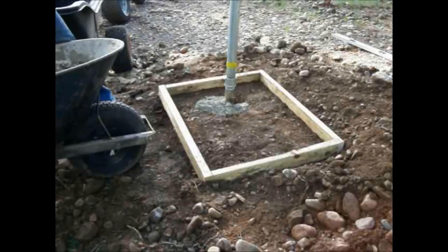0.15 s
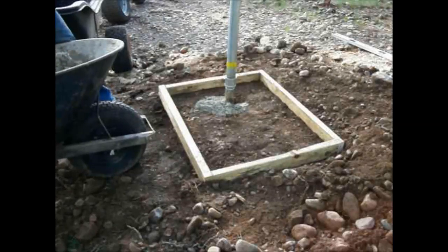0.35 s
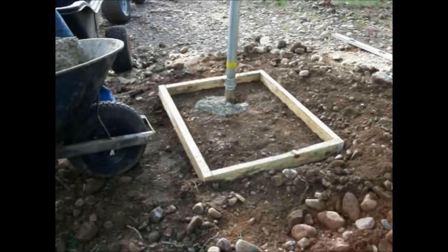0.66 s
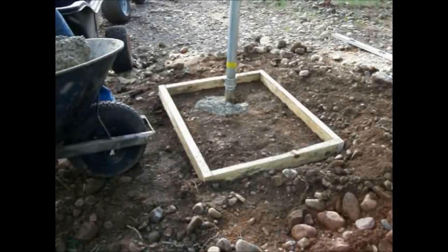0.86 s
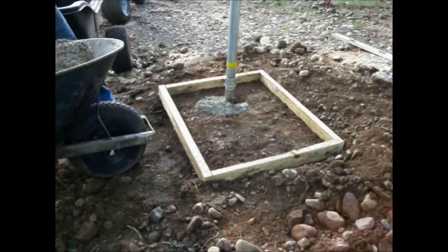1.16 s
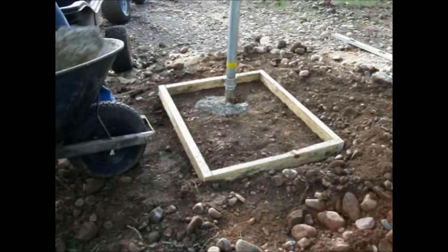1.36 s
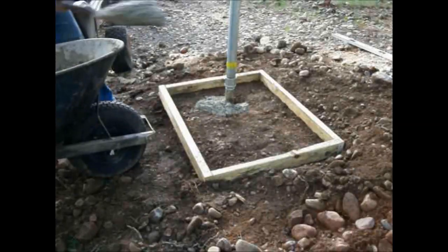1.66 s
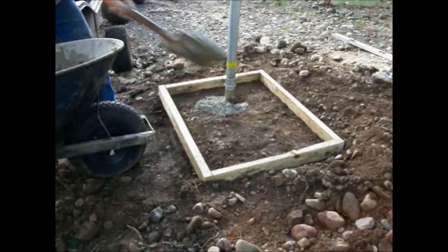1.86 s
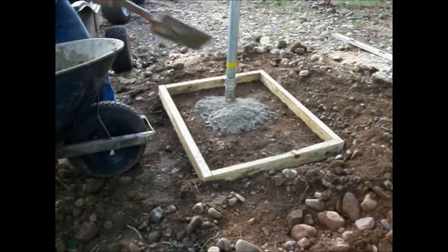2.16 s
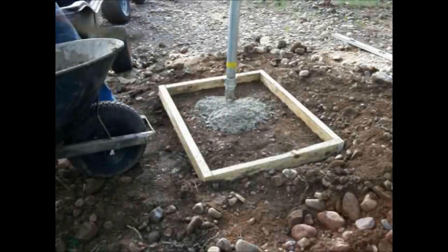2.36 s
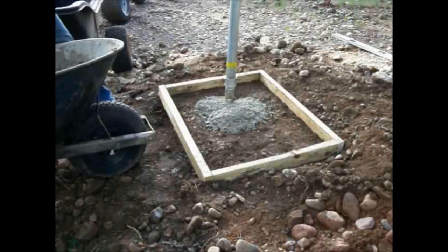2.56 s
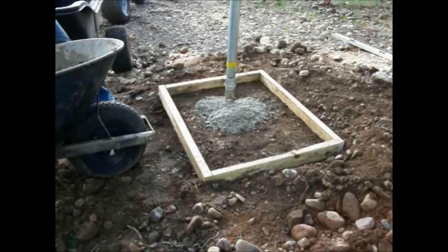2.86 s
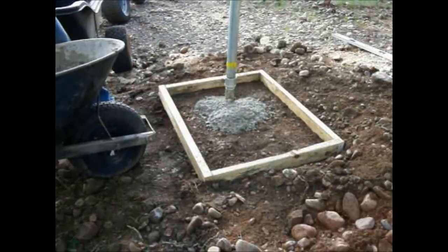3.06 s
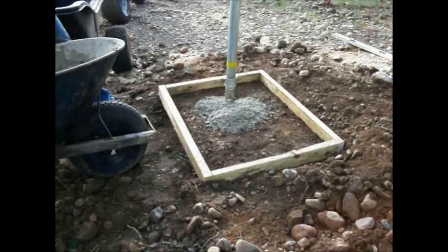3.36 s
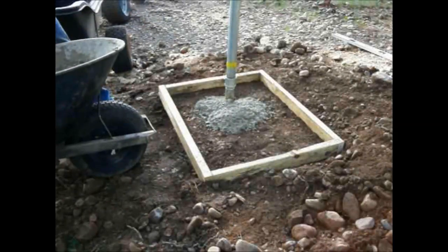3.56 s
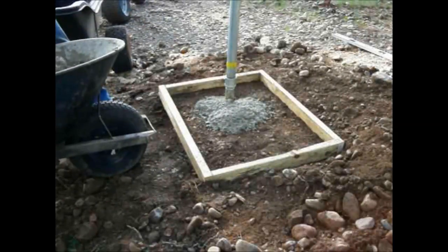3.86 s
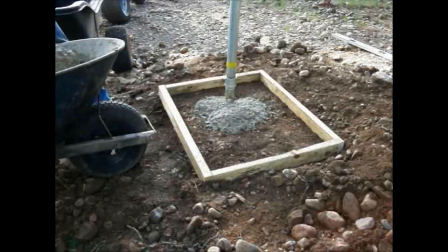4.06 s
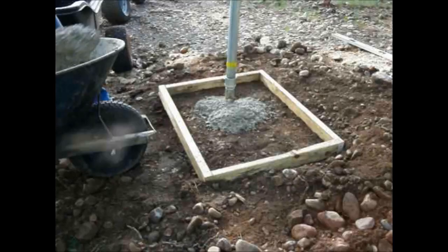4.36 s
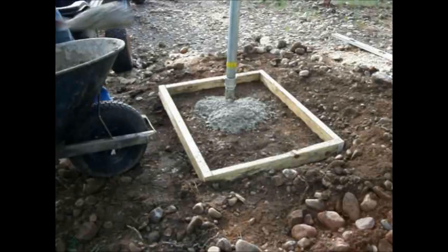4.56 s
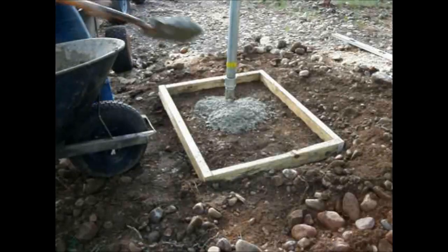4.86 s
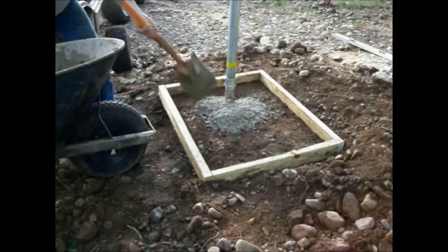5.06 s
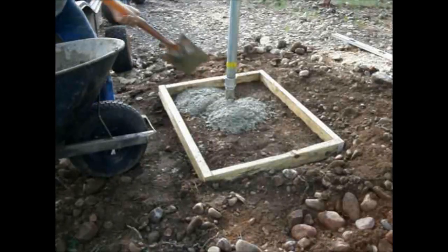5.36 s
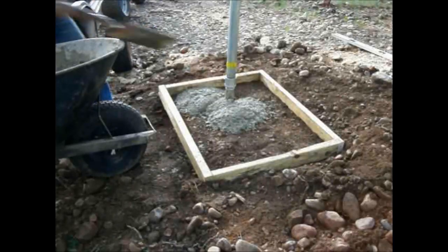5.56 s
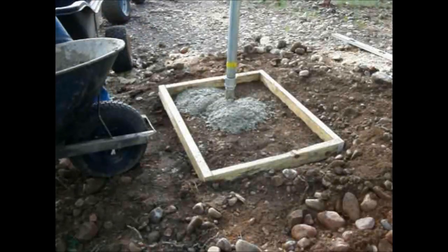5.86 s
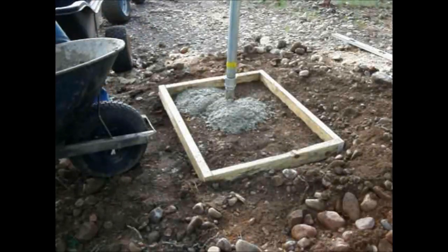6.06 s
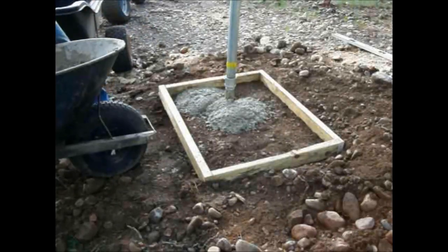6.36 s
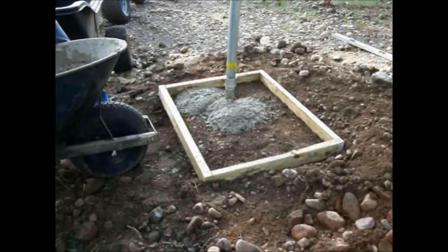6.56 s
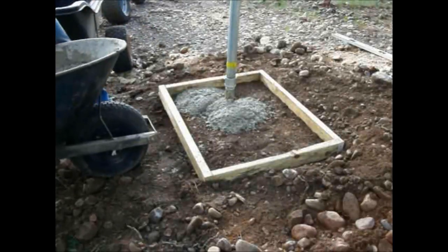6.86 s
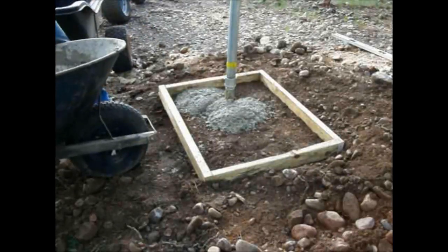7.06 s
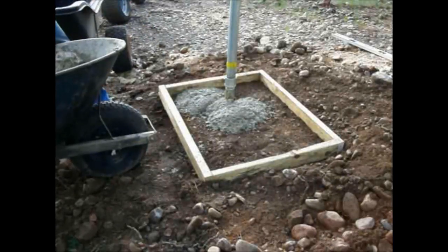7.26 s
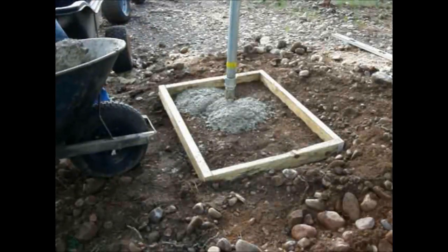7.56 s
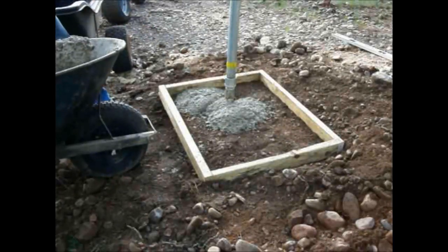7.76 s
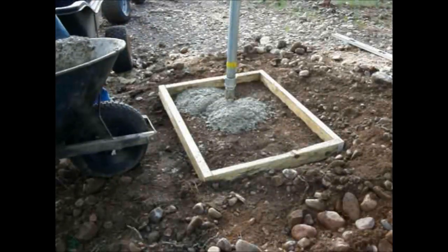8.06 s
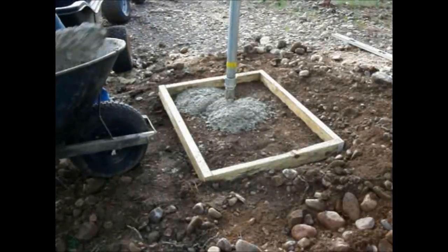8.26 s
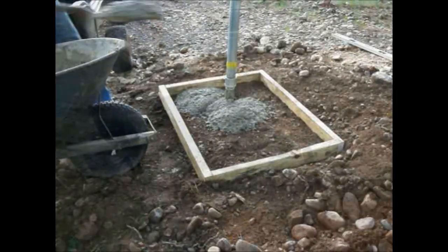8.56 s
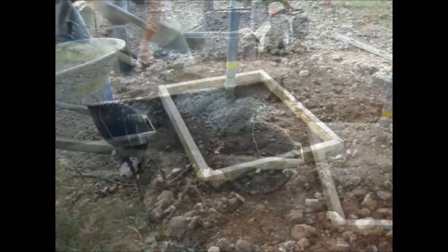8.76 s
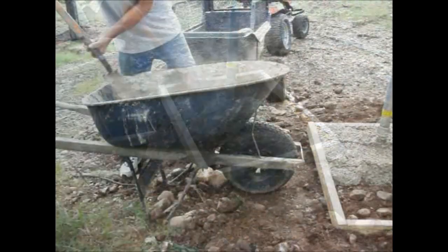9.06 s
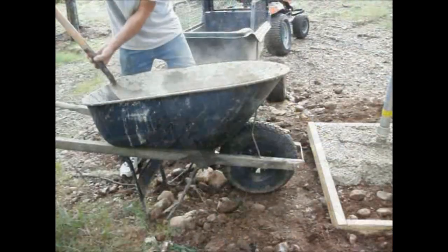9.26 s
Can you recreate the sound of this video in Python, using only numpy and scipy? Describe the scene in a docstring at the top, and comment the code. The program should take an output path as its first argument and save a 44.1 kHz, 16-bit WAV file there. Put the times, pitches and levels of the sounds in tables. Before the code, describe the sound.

Outdoors, faint air noise, a far hum and low wind rumble sit under close shovel work, with soft wind bumps near 0.8 and 1.3 seconds. Light grit settles, then mix slides off the blade at 1.6 and more sharply at 2.0. At 2.46 the blade cracks against the steel rim with a short double clang. From 2.9 to 3.2 a harsh, jerky dig crunches and scrapes through wet gravel, then loose stones settle. Clicks come around 4.5 to 4.7, and a gritty dump at 5.15 to 5.25. At 5.64 to 5.8 the blade drags and clangs in a quick ringing cluster. A second dig, 6.2 to 6.55, grinds hollowly with a thud and stuttering tub groan, fading by 6.9. Sparse settling follows; soft slides return from 8.6, a swishy scrape at 9.05, then a loud tub boom at 9.19 and a crunching dig cut off at the end, about 9.4.

```python
"""Outdoors, a shovel digs wet gravelly concrete out of a steel wheelbarrow and tips it on the ground.
Uneven small contacts make the grit crunch; stones jolt the blade, which scrapes with damped resonances.
The tub booms and groans, the empty blade rings on the rim as a set of dying tones, and stones clack as
short noise bursts. Behind are air noise, a far hum and a low rumble, mostly wind on the microphone.
A small camera with gain control samples it all at a quarter of the rate."""
import sys
import numpy as np
from scipy import signal
from scipy.fft import rfft, irfft, next_fast_len
from scipy.io import wavfile
from scipy.ndimage import uniform_filter1d

SR = 44100
rng = np.random.default_rng(int(sys.argv[2]) if len(sys.argv) > 2 else 0)


def master(y):
    """Save y as 16-bit WAV."""
    cut = np.clip(np.atleast_2d(y).T, -1, 1)
    pcm = np.round(cut * 32767)  # scale
    wavfile.write(sys.argv[1], SR, pcm.astype(np.int16))


N = 415863
T = np.arange(N) / SR

# In all tables, levels are relative: later mixing gains shift them.
# resonances of the blade under load: f/Hz, width/Hz, level/dB
LOADED_BLADE = [(797, 250, 4.5), (966, 120, 5.5), (1230, 47, -14), (1964, 46, 6), (2200, 120, 7.5)]


def gain_of(db):
    """Turns decibels into an amplitude factor."""
    return 10 ** (np.asarray(db) / 20)


def evened(x):
    """Scales a sound to an rms of 1."""
    return x / np.sqrt(np.mean(x ** 2) + 1e-20)


def level(rows, column):
    """Reads a dB column as amplitude over time, practically silent outside the table."""
    rows = np.array(rows)
    return gain_of(np.interp(T, rows[:, 0], rows[:, column], left=-200, right=-200))


def track(tables):
    """Draws one frequency curve through tables of (t/s, f/Hz)."""
    return np.interp(T, *np.vstack(tables).T)


def coloured(x, points):
    """Filters x with a smooth curve through (f/Hz, level/dB) points, then evens it."""
    f, db = np.transpose(points)
    size = next_fast_len(N)
    hz = np.fft.rfftfreq(size, 1 / SR)
    curve_db = np.interp(np.log(hz + 1), np.log(f + 1), db)
    return evened(irfft(rfft(x, size) * gain_of(curve_db), size)[:N])


def resonate(x, hz, width):
    """Lets x excite one resonance (two poles, gain about 1 at its peak); a narrow one rings longer."""
    r = np.exp(-np.pi * width / SR)
    turn = 2 * r * np.cos(2 * np.pi * hz / SR)
    return signal.lfilter([(1 - r * r) / 2, 0, (r * r - 1) / 2], [1, -turn, r * r], x)


def follow(x, hz, width):
    """A resonance that moves: shift its frequency to zero, smooth, shift back."""
    turn = np.exp(2j * np.pi * np.cumsum(hz) / SR)
    r = np.exp(-np.pi * width / SR)
    return 2 * (turn * signal.lfilter([1 - r], [1, -r], x / turn)).real


def lumps(per_s, depth_db):
    """A gain that wanders at random, with per_s turning points a second."""
    knots = rng.standard_normal(1000)
    return gain_of(depth_db * np.interp(T * per_s, np.arange(1000), knots))


def grains(per_s, spread_db, lo_hz, hi_hz, cycles, count=14):
    """Random contacts of uneven size, each a few dying cycles at one of count pitches."""
    size = gain_of(spread_db * np.minimum(rng.exponential(1, N), 5))
    size *= rng.random(N) < per_s / SR
    size *= rng.choice([-1, 1], N)
    kind = rng.integers(0, count, N)
    out = np.zeros(N)
    for k, hz in enumerate(np.geomspace(lo_hz, hi_hz, count)):
        out += resonate(size * (kind == k), hz, hz / (np.pi * cycles))
    return evened(out)


def bump(s, hold, db, rise, fall):
    """An amplitude that swells to s, holds and dies away; all times in seconds."""
    out = np.zeros(N)
    near = slice(max(round((s - .5) * SR), 0), round((s + hold + .8) * SR))
    t = T[near] - s
    swell = np.minimum(t, 0) / max(rise, 1e-3)
    fade = np.maximum(t - hold, 0) / max(fall, 1e-3)
    out[near] = gain_of(db) * np.exp(swell - fade)
    return out


def add(mix, s, sound):
    """Mixes a sound in at s seconds, cut off at the end of the mix."""
    part = mix[round(s * SR):][:len(sound)]
    part += sound[:len(part)]


def outdoors():
    """Air noise and a far hum waver at random; a low rumble and single gusts are slow pressure noise."""
    # tone of the distant air: f/Hz, level per Hz/dB
    air_tone = [(12, -58), (20, -5.5), (35, -19), (41, -39), (54, -24.5), (128, -14), (182, -18.5),
                (880, -21), (4050, -32), (4780, -43), (5500, -25), (7150, -80), (12100, -120)]
    # strength of the low rumble: wind, and at 6.38 s the thud of the dig: t/s, level/dB
    rumble_level = [(0, -52), (.07, -64), (.3, -50), (.59, -42), (.7, -49), (.9, -50), (1.04, -42.5),
                    (1.2, -50), (1.4, -49), (1.75, -58), (5.3, -54.5), (6.05, -62), (6.38, -39), (6.5, -61),
                    (9.1, -62), (9.43, -54)]
    # single gusts pushing the microphone: t/s, peak level/dB, f/Hz
    puffs = [(.785, -29.5, 30.2), (1.3, -26.5, 32.2)]
    # tone of the rumble: (f/Hz, level/dB)
    rumble_tone = [(12, -12), (30, -0.5), (70, -2), (160, -13.5), (400, -70)]
    hum_hz = 133.5

    air = gain_of(-43.5) * coloured(rng.standard_normal(N) * lumps(per_s=9, depth_db=.8), air_tone)
    hum = resonate(rng.standard_normal(N), hum_hz, 13.0) + 0.14 * np.sin(2 * np.pi * hum_hz * T)
    rumble = coloured(rng.standard_normal(N) * lumps(per_s=18, depth_db=3.5), rumble_tone)
    out = air + gain_of(-54.5) * evened(hum) + level(rumble_level, 1) * rumble
    for s, db, hz in puffs:
        turns = np.arange(0, 1.5, hz / SR)  # one and a half cycles
        add(out, s, gain_of(db) * np.sin(2 * np.pi * turns) * np.hanning(len(turns)))
    return out


def clacks():
    """Each short clack is a dying noise burst around its own pitch; louder ones ring longer."""
    # short clacks: stones, and at 2.4575 s the crack of the blade's strike: t/s, level/dB, f/Hz
    hits = [(.429, -26, 2200), (.544, -31, 2000), (1.574, -27, 2400), (1.596, -28, 3400),
            (1.609, -22, 3500), (1.731, -23, 4200), (1.967, -21, 2450), (2.012, -6, 2900),
            (2.373, -24, 3600), (2.4575, 6, 1750), (2.488, -8, 1750), (2.8835, -27, 3800),
            (2.904, -2, 2950), (2.934, -8, 2550), (2.989, -5, 1400), (3.052, 2, 2750), (3.282, -26, 2550),
            (4.048, -26, 3900), (4.209, -30, 4200), (4.304, -33, 2950), (4.4765, -17, 3600),
            (4.6425, -15, 4500), (4.662, -17, 4400), (4.698, -24, 3500), (4.74, -32, 3400),
            (5.134, -20, 3400), (5.162, -9, 3000), (5.517, -29, 1500), (5.64, -7, 1900), (5.714, -2, 3900),
            (6.188, -17, 3800), (6.197, -13, 4300), (6.224, -9, 2000), (6.249, -5, 1300), (6.297, -3, 2200),
            (6.3635, 3, 4300), (6.416, 2, 2350), (6.459, -6, 1300), (6.539, -13, 2400), (7.303, -27, 3900),
            (7.359, -32, 2900), (7.605, -33, 3200), (7.739, -31, 3500), (8.209, -34, 1850),
            (8.373, -32, 3250), (8.467, -29, 2500), (8.523, -29, 2500), (8.554, -27, 2050),
            (8.621, -24, 2200), (8.691, -21, 1600), (8.901, -17, 1650), (8.961, -22, 1650), (9.19, 8, 1550),
            (9.236, -6, 1600), (9.276, -3, 1250), (9.337, -1, 1300), (9.351, 0, 3600), (9.403, -7, 2200)]
    out, t = np.zeros(N), T[:5000]
    for (s, db, hz), noise in zip(hits, rng.standard_normal((len(hits), 5000))):
        burst = evened(resonate(noise, hz, 2000) + resonate(noise, hz, 440))
        t60 = .035 + .0005 * db  # seconds to die by 60 dB
        add(out, s, gain_of(db - 60 * t / t60) * burst)
    return out


def blade():
    """Strikes start the blade's modes, each stilling the ring before it; rim friction also feeds them."""
    # natural tones of the empty blade: f/Hz, level/dB, time to die by 60 dB/s
    modes = [(950, -34, 0.15), (1068, -0.5, 0.32), (1074, -15, 0.8), (1210, -6.5, 0.24), (1270, -25, 0.55),
             (1330, -13, 0.23), (1513, -8, 0.16), (1590, -16, 0.18), (1730, -4, 0.35), (1863, -11, .22),
             (1913, -5.5, 0.26), (2140, -6, 0.11), (2374, -5.5, 0.091), (2370, -17, 0.11),
             (2700, -23, 0.25), (2880, -32, 0.088), (3020, -6, 0.066), (3150, -12, 0.16), (3640, -5, 0.09),
             (3780, -3.5, 0.059), (3900, -6, 0.084), (4330, -39, 0.14), (4430, -13, 0.2), (4900, -23, 0.26),
             (5100, -47, .2)]
    # drags over the rim: t/s, length/s, friction feeding the modes/dB, rasp length/s, direct rasp/dB
    drags = [(2.456, 0.078, -24, 0.011, 2.5), (5.637, 0.078, -9, 0.074, -5),
             (5.715, .065, -16, 0.031, -0.5), (9.035, .055, -26, 0.048, -22)]
    # strikes on the rim: t/s, level/dB, brightness/dB per octave, time for the ring to swell up/s
    clangs = [(2.458, -5, 7.5, 0.0036), (2.488, 1, 0, 0.0094), (5.641, 1, 2.5, 0.0042),
              (5.695, -3.5, 3.5, 0.0034), (5.716, 2.5, 0, 0.0033), (5.744, -3.5, 6, 0.0026),
              (5.765, -8, 3.5, 0.0071), (6.749, -20, -2, 0.0021), (9.085, -22, -8, 0.017)]
    # a faint narrow swish before a dig: t/s, length/s, level/dB
    swishes = [(2.775, 0.16, -47), (6.04, .14, -50)]

    out = np.zeros(N)
    noise = evened(rng.standard_normal(N) * lumps(per_s=90, depth_db=3.0))
    for s, length, rub_db, rasp_s, rasp_db in drags:
        start = s - .01  # early enough to catch the swell
        near = slice(round(start * SR), round(start * SR) + 30000)
        rub = (noise * bump(s, length, rub_db, 0.00082, 0.033))[near]
        rasp = (noise * bump(s, rasp_s, rasp_db, 0.00082, 0.011))[near]
        # the root keeps long, narrow modes from coming out weaker
        fed = sum(gain_of(db) * np.sqrt(t60) * resonate(rub, hz, 3 / t60) for hz, db, t60 in modes)
        add(out, start, gain_of(22.5) * fed + 1.8 * resonate(rasp, 3500, 4500))

    hz, mode_db, t60 = np.transpose(modes)[:, :, None]
    t = T[:30000]
    until_next = np.diff(np.array(clangs)[:, 0], append=np.inf)
    # each strike lands on another spot, so the modes' balance differs
    spots_db = 2 * rng.standard_normal((len(clangs), len(modes), 1))
    for (s, db, tilt_db, swell), lasts, spot_db in zip(clangs, until_next, spots_db):
        struck_db = db - 7.5 + mode_db + tilt_db * np.log2(hz / 1070) + spot_db
        ring = (gain_of(struck_db - 60 * t / t60) * np.sin(2 * np.pi * hz * t)).sum(0)
        ring *= 1 - np.exp(-t / max(swell, 1e-3))
        ring *= np.exp(-np.maximum(t - lasts, 0) / 0.0045)  # the next strike stills it
        add(out, s, ring)

    swish_gain = sum(bump(*row, .02, .01) for row in swishes)
    return out + swish_gain * evened(resonate(noise, 3430, 350))


def tub(gain):
    """The steel tub groans with a stutter under the blade's uneven push and booms under single blows."""
    # resonances of the tub: f/Hz, width/Hz, level/dB
    tub_modes = [(211, 31, -8.5), (313, 100, -6.5), (489, 94, -9.5), (624, 27, -14.5)]
    # the tub's main tone under changing load: t/s, f/Hz
    main_tone = [(1.6, 430), (2.9, 425), (3.3, 400), (3.7, 385), (6.25, 420), (6.5, 405), (6.7, 365),
                 (6.82, 370), (7.2, 372), (9.2, 370)]
    # single blows: t/s, level/dB, time for the main tone to die by 60 dB/s
    blows = [(2.455, -8, 0.074), (2.905, -12, .12), (5.515, -29, 0.058), (5.639, -19, 0.092),
             (5.7, -17, 0.11), (6.22, -19, .06), (6.416, -11, 0.097), (6.5, -13, 0.04), (6.803, -12, 0.06),
             (9.19, 10.5, 0.19), (9.234, -3, 0.06), (9.339, -3, 0.1), (9.36, -9, .06), (9.405, -9, .08)]

    push = rng.standard_normal(N) * lumps(per_s=54, depth_db=3.0)
    groan_hz = track([main_tone])
    boom = sum(gain_of(db) * resonate(resonate(push, hz, w), hz, w) for hz, w, db in tub_modes)
    wobble_hz = groan_hz * lumps(per_s=45, depth_db=.33)
    groan = np.sin(2 * np.pi * np.cumsum(wobble_hz) / SR) * lumps(per_s=60, depth_db=5.0)
    stutter_hz = 45 * lumps(per_s=25, depth_db=2.)
    groan *= .3 + abs(np.cos(np.pi * np.cumsum(stutter_hz) / SR))  # stick and slip
    out = gain_of(-3.5) * gain * evened(0.5 * evened(boom) + groan)

    t = T[:12000]
    for s, db, t60 in blows:
        # side tones die faster than the main tone
        ring = sum(gain_of(d + 11.5 - 60 * t / 0.053) * np.sin(2 * np.pi * hz * t)
                   for hz, w, d in tub_modes)
        ring += sum(gain_of(d - 1 - 60 * t / 0.038) * np.sin(2 * np.pi * hz * t)
                    for hz, w, d in LOADED_BLADE[:2])
        ring += np.sin(2 * np.pi * groan_hz[round(s * SR)] * t)
        onset = np.minimum(t / 0.0016, 1)
        add(out, s, gain_of(db - 9.5 - 60 * t / t60) * ring * onset)
    return out


def handling():
    """How hard the mix is worked: digs, slides and settling add in power; depth sets the hollow tone."""
    # loose mix settling between strokes: t/s, level/dB, coarse part against it/dB
    settling = [(0, -42, 4), (.4, -40, -1), (.52, -41.5, -0.5), (.75, -55.5, 6), (1.2, -54, 10),
                (1.55, -46, 1), (1.9, -47, -6), (2.4, -56, 4), (2.53, -40, 0), (2.85, -59, 11),
                (3.3, -38, 6), (3.6, -43, 5), (4.0, -43.5, 0), (4.39, -52.5, -8), (4.95, -47.5, 3),
                (5.5, -56, -3), (5.8, -41, 2), (6.15, -63.5, 8), (6.86, -42.5, 6.5), (7.2, -42, 2.5),
                (7.6, -48, 0), (8.25, -60, 4), (8.6, -47, 2), (9.43, -38, 7)]
    # one curve a dig, blade pushed into the mix: t/s, effort/dB, depth (0 to 1)
    digs = [
        [(2.897, -30, .3), (2.903, -9.5, 0.5), (2.93, -11.5, 0.6), (2.99, -4, 0.6), (3.02, -12.5, 0.75),
         (3.058, -2, 0.67), (3.07, -5.5, 0.95), (3.085, -2, 0.8), (3.14, -6.5, 0.83), (3.185, -8, 0.82),
         (3.207, -23.5, 0.8), (3.28, -30.5, 0.44)],
        [(6.18, -38, 0), (6.22, -14, 0), (6.25, -9, 0.63), (6.285, -6, 0.48), (6.335, -3.5, 0.82),
         (6.36, -4.5, .65), (6.408, -10, 0.26), (6.42, -6, 0.4), (6.505, -13, 0.73), (6.535, -23.5, 0.14),
         (6.58, -27, 0.4), (6.72, -30.5, 0.62), (6.765, -25.5, 0.3), (6.815, -28.5, 0.2), (6.845, -42, .2)],
        [(9.187, -29, 0.5), (9.191, -3, 0.5), (9.198, -9, 0.8), (9.23, -15, 1), (9.236, -8, 1),
         (9.255, -14.5, 0.7), (9.29, -2, 0.3), (9.31, -8.5, 1), (9.333, -15, 0.6), (9.339, -4, 1),
         (9.37, -5, 0.8), (9.395, -13, .7), (9.43, -3, 0.47)],
    ]
    # each dig's mix against its effort: grit/dB, tub/dB
    mixes = [(-10.5, -6), (-9.5, -3), (-16.5, -21)]
    # mix sliding off or over the blade: peak t/s, grit level/dB, rise/s, fall/s, coarse against grit/dB
    slides = [(1.606, -31.5, 0.0087, 0.081, -2), (1.735, -38.5, 0.013, 0.073, -2),
              (1.975, -29, 0.019, .02, 2), (2.017, -11, .02, 0.025, -10), (2.094, -20, 0.031, 0.064, -1),
              (4.06, -41, .05, 0.07, -3), (4.478, -46, 0.009, 0.086, 1), (4.644, -29, 0.0027, 0.028, -8),
              (4.704, -35.5, .015, 0.0078, -8), (5.12, -29.5, 0.064, 0.056, -2),
              (5.165, -17, 0.02, 0.051, -1.5), (5.222, -12.5, 0.04, 0.019, -12),
              (5.3, -35.5, 0.051, 0.043, 1), (8.624, -32, .002, 0.082, 1.5), (8.71, -29, 0.044, .1, 2.5),
              (8.85, -40.5, 0.053, 0.052, 6), (8.93, -37, 0.056, 0.055, 3),
              (9.041, -12, 0.02, 0.035, -11.5), (9.08, -13, 0.03, 0.015, -7)]
    # the tub hums on: t/s, length/s, level/dB
    groans = [(0, 0.067, -45), (1.608, .01, -37), (3.177, .012, -19), (3.29, 0.29, -38),
              (6.368, .14, -11.5), (6.558, 0.097, -26), (6.682, 0.054, -28), (6.783, 0.021, -18),
              (6.88, 0.2, -39.5), (8.75, 0.15, -45)]
    # change from a buried blade to one at the surface
    shallow_grit_db, shallow_scrape_db, shallow_tub_db = 9, -5.5, -27
    # the hollow tone drops as the blade goes in
    bite_shallow_hz, bite_deep_hz = 1380, 720

    s, db, coarse_db = np.transpose(settling)
    layers_db = [db, db + coarse_db, db - 13.5]  # grit, scrape, tub
    power = np.array([gain_of(np.interp(T, s, layer_db)) for layer_db in layers_db]) ** 2
    bite = []
    jerks = lumps(per_s=45, depth_db=4)  # the buried blade advances in jerks
    for rows, (grit_db, tub_db) in zip(digs, mixes):
        s, db, depth = np.transpose(rows)
        buried = np.clip(depth, 0, 1)
        shallow = 1 - buried
        layers_db = [grit_db + shallow_grit_db * shallow,
                     shallow_scrape_db * shallow,
                     tub_db + shallow_tub_db * shallow]
        jerking = jerks ** np.interp(T, s, buried)  # stronger when deeper
        for k, layer_db in enumerate(layers_db):
            power[k] += (jerking * level(np.c_[s, db + layer_db], 1)) ** 2
        bite.append(np.c_[s, bite_deep_hz + (bite_shallow_hz - bite_deep_hz) * shallow])
    for s, db, rise, fall, coarse_db in slides:
        power += (bump(s, 0, db, rise, fall) * gain_of([[0], [coarse_db], [-29]])) ** 2
    power[2] += sum(bump(*row, rise=0.018, fall=0.026) ** 2 for row in groans)
    return np.sqrt(power), track(bite)


def scrape(gain, bite_hz):
    """Larger stones jolt and knock the loaded blade, which answers with damped resonances."""
    # tone of the jolts: f/Hz, level per Hz/dB
    jolt_tone = [(59, -61), (100, 1.5), (230, 4.5), (433, -0.5), (590, 0.5), (967, -2), (1180, 1.5),
                 (1940, 1.5), (4000, -20), (5200, -51), (8800, -120)]
    jolts = grains(per_s=1800, spread_db=-0.5, lo_hz=159, hi_hz=3000, cycles=1.28)
    knocks = grains(per_s=250, spread_db=3.0, lo_hz=523.4, hi_hz=2612, cycles=17.5)
    jolts = coloured(jolts + 0.62 * knocks, jolt_tone)
    body = 1.97 * jolts
    body += sum(gain_of(db + 1.5) * resonate(jolts, hz, w) for hz, w, db in LOADED_BLADE)
    body += gain_of(4.0) * follow(jolts, bite_hz, 260.0)  # the hollow tone
    return gain_of(-4.0) * gain * evened(body * lumps(per_s=70, depth_db=2.5))


def grit(gain):
    """Small stones crunch past each other as very short contacts; some ping longer on the steel."""
    # tone of the crunch: f/Hz, level per Hz/dB
    crunch_tone = [(180, -34), (300, -24), (364, -5), (615, -14.5), (942, -17.5), (1530, -3.5),
                   (1670, -3.5), (3070, -1.5), (5500, -1), (7150, -47), (12100, -120)]
    crunch = grains(per_s=5000, spread_db=1.8, lo_hz=500, hi_hz=6000, cycles=2.2)
    pings = grains(per_s=500, spread_db=1.5, lo_hz=1204.4, hi_hz=5180, cycles=42.0, count=24)
    crunch += 0.5 * pings
    return gain_of(4.5) * gain * coloured(crunch * lumps(per_s=78, depth_db=0.5), crunch_tone)


def scene():
    """Close work in the open, with one faint bounce off the ground."""
    (grit_gain, scrape_gain, tub_gain), bite_hz = handling()
    near = grit(grit_gain) + scrape(scrape_gain, bite_hz) + tub(tub_gain) + blade() + clacks()
    bounce = 0.028 * np.roll(near, 130)  # about 3 ms later
    return (near + bounce + outdoors())[None]


def record(dry):
    """A small camera: an offset that doubles at 8.62 s, gain control, quarter-rate samples joined up."""
    # the offset doubles where a second shot's own offset fades in and adds to the first
    x = dry[0] - .026 * (1 + np.clip((T - 8.62) / 0.0059, 0, 1))
    # gain control follows the loudest recent level
    power_db = 10 * np.log10(abs(uniform_filter1d(dry[0] ** 2, 500, origin=150)) + 1e-12)
    fall_db = T * 400.  # the followed level falls by 400 dB a second
    held_db = np.maximum.accumulate(power_db + fall_db) - fall_db
    over_db = np.maximum(held_db + 17, 0)  # what exceeds -17 dB
    x = x / gain_of(.6 * uniform_filter1d(over_db, 200))
    # low-pass, keep every fourth sample, join them by straight lines
    x = signal.oaconvolve(x, signal.firwin(41, 5900, fs=SR), "same")
    x = np.interp(np.arange(N), np.arange(0, N, 4), x[::4])
    x = signal.lfilter([.8, .2], 1, x)  # playback dulls the top a little
    x = np.tanh(.8 * x) / .8  # the loudest peaks are rounded off
    band_limit = signal.firwin(511, 15780, window=("kaiser", 9), fs=SR)
    return signal.oaconvolve(x[None], band_limit[None], "same")


dry = scene()
out = record(dry)
master(out)
```